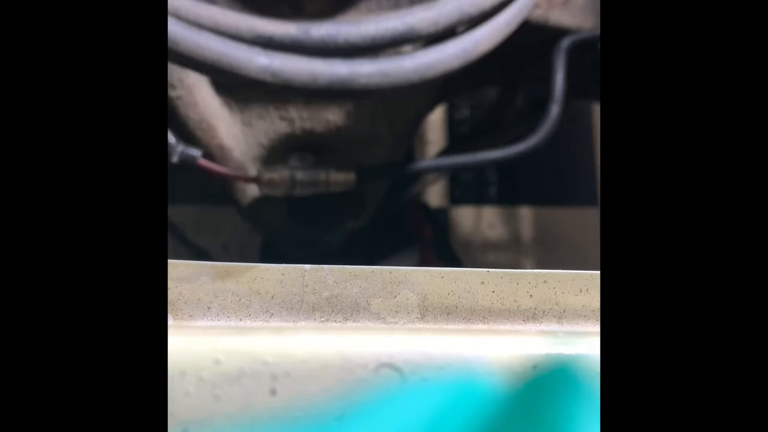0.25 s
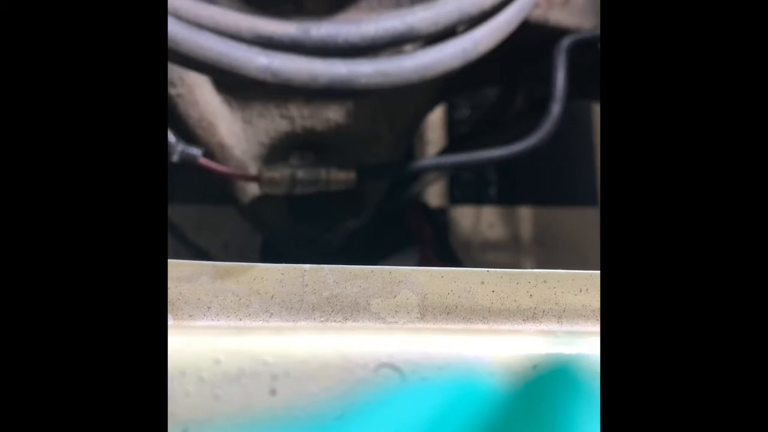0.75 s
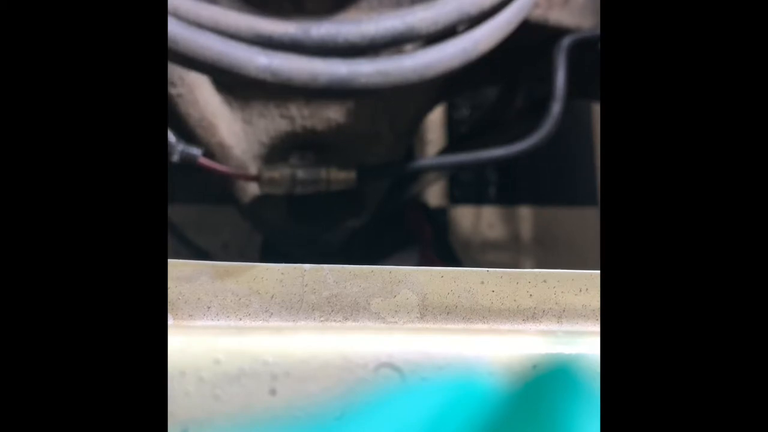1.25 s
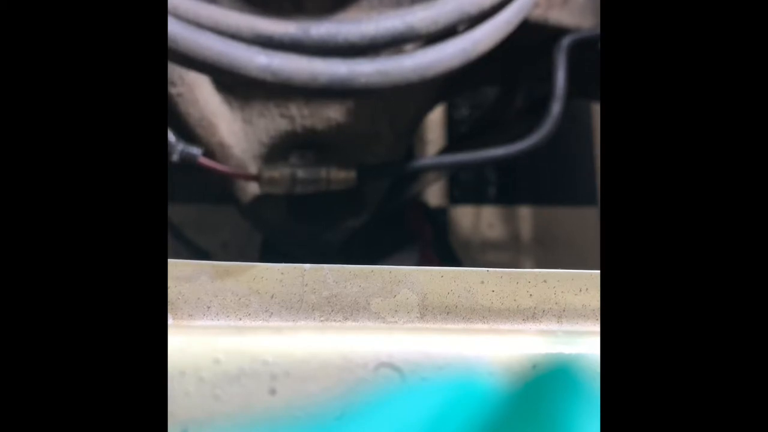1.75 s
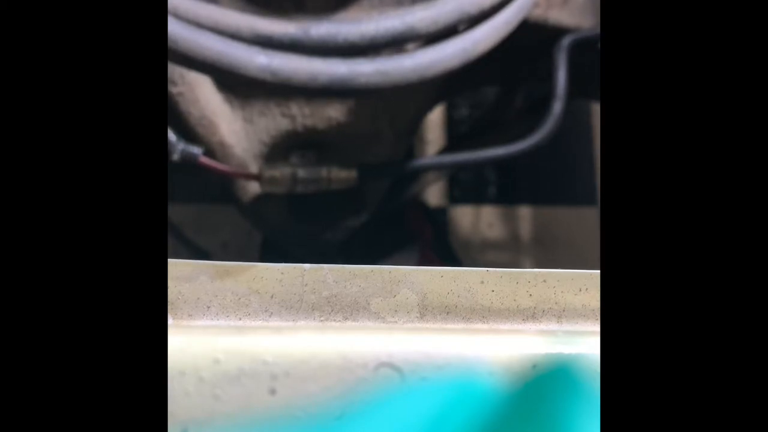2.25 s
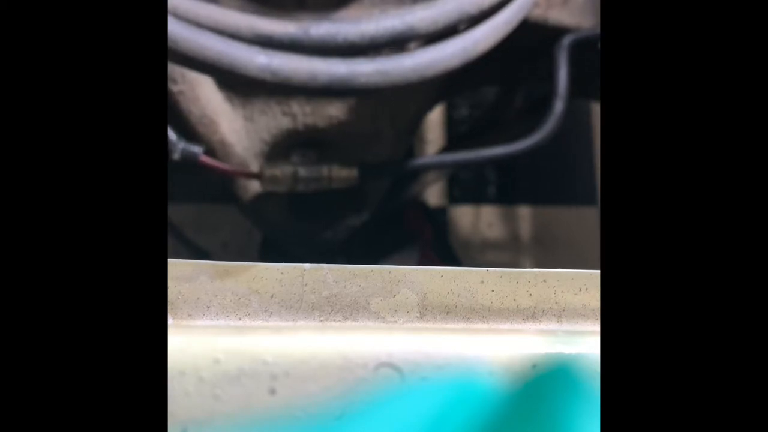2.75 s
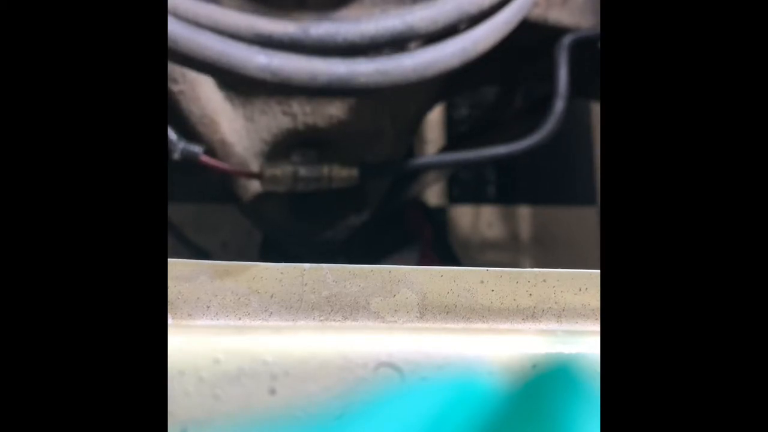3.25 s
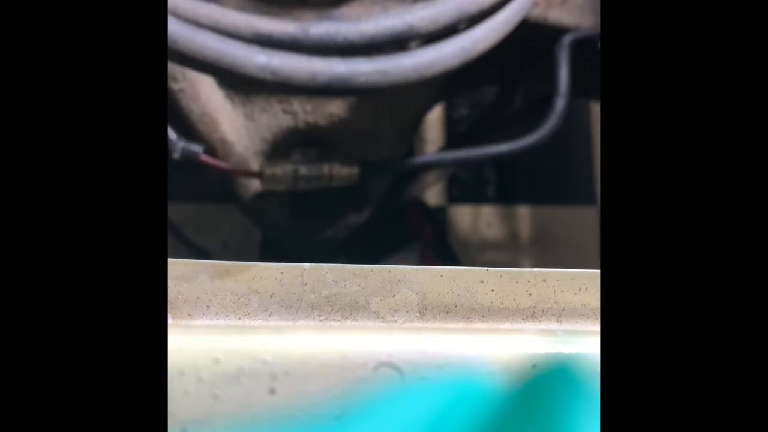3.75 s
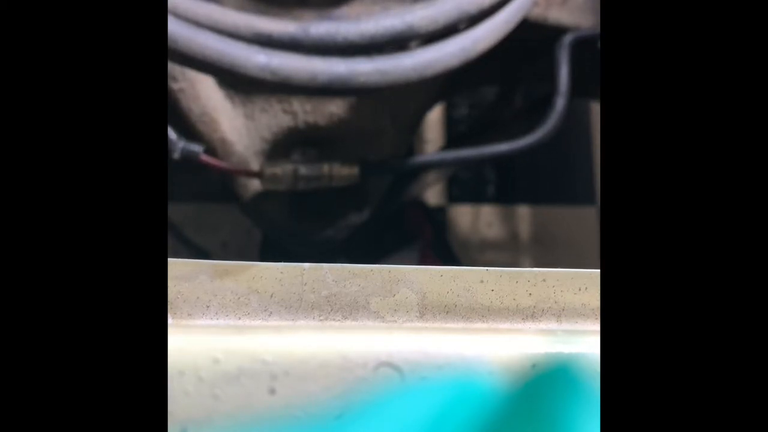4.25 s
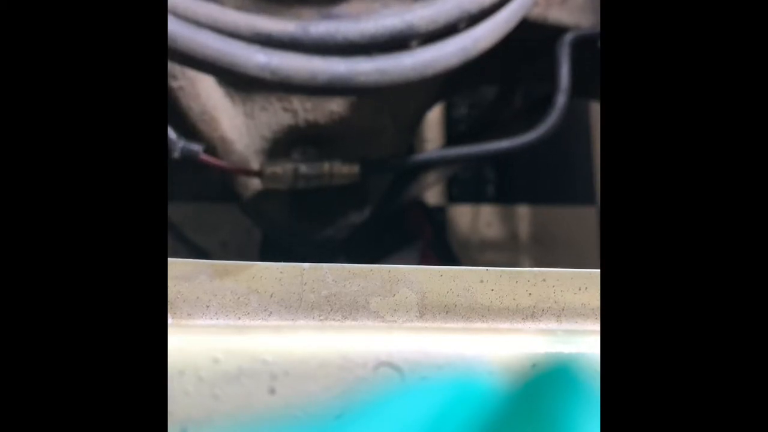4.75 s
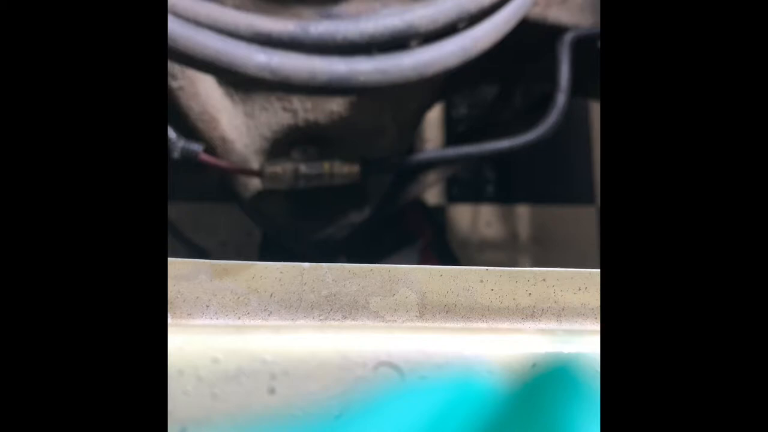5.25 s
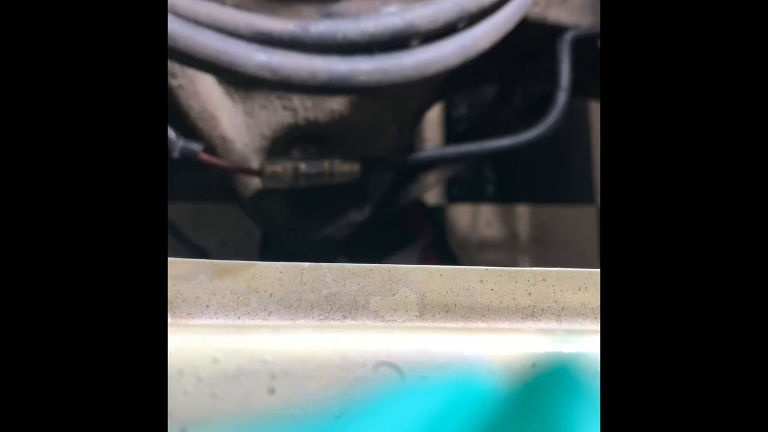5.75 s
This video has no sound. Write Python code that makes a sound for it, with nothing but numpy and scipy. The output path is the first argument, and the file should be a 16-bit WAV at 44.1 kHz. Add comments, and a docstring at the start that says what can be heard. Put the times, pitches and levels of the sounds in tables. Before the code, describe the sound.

A hydraulic floor jack is pumped in a garage, its steel handle clanking about once a second between rasping strokes.

```python
"""A hydraulic floor jack is pumped, and its steel handle linkage clanks at the turns of each stroke.
The piston rubs and groans as it lifts, the handle rustles, small knocks ring a hollow part and the
frame thumps. Behind it the car body hums low over the hush of a bare garage. The clanks, knocks and
thumps echo in the room. Left and right sound partly alike and out of step."""
import sys
import numpy as np
from scipy import signal
from scipy.fft import rfft, irfft
from scipy.io import wavfile
from scipy.ndimage import uniform_filter1d

SR = 44100
rng = np.random.default_rng(int(sys.argv[2]) if len(sys.argv) > 2 else 0)


def log_audio(samples):
    """Write samples as a 16-bit WAV file to the path given in sys.argv[1]."""
    # one column per channel
    frames = np.atleast_2d(samples).T
    # limit to full scale, then quantise
    limited = np.clip(frames, -1, 1)
    pcm = np.round(limited * 32767).astype(np.int16)
    wavfile.write(sys.argv[1], SR, pcm)


N = 264600  # 6 seconds


def gain_of(db):
    """Turns decibels into a number to multiply by."""
    return 10 ** (np.asarray(db) / 20)


def unit_rms(x):
    """Scales a signal so that its average power is 1."""
    return x / np.sqrt(np.mean(x ** 2) + 1e-20)


def look_up(table, hz):
    """Reads between the rows of a table, on a log-frequency scale."""
    f, value = np.transpose(table)
    return np.interp(np.log(hz + 1), np.log(f + 1), value)


def coloured(x, spectrum):
    """Makes each frequency louder or softer, as a table says."""
    return irfft(rfft(x) * gain_of(look_up(spectrum, np.fft.rfftfreq(N, 1 / SR))), N)


def resonate(x, hz, width):
    """Lets through a band of sound around one pitch."""
    pole = np.exp((2j * np.pi * hz - np.pi * width) / SR)
    return 2 * signal.lfilter([1 - abs(pole)], [1, -pole], x).real


def add(mix, start, sound):
    """Mixes a sound in, beginning at start seconds."""
    part = mix[..., round(start * SR):][..., :sound.shape[-1]]
    part += sound[..., :part.shape[-1]]


def gritty(grit_db):
    """Noise whose samples differ widely in size, as from many tiny contacts."""
    return unit_rms(rng.standard_normal((2, N)) * gain_of(grit_db * np.minimum(rng.exponential(1, N), 6)))


def wander(samples):
    """A slow random drift: noise smoothed twice over this many samples."""
    return unit_rms(uniform_filter1d(uniform_filter1d(rng.standard_normal(N), samples), samples))


def smooth_gain(powers):
    """Turns rows of power, given every 64th sample, into gain at every sample."""
    return np.array([np.interp(np.arange(N), 64 * np.arange(len(p)), np.sqrt(p)) for p in powers])


def held(rows, attack_s=0.033, sag_db=-6, release_s=0.065):
    """One loudness curve per level column: each event rises, sags while it lasts, then fades."""
    start, length, *db = np.transpose(rows)[..., None]
    t = np.arange(0, N + 64, 64) / SR - start
    rise = np.clip(t / attack_s, 0, 1)
    sag = gain_of(sag_db * np.clip(t / length, 0, 1))
    fade = np.exp(-np.maximum(t - length, 0) / release_s)
    return smooth_gain(((gain_of(db) * rise * sag * fade) ** 2).sum(axis=1))


# The tone of the room's hush: f/Hz, level/dB
AIR_TONE = [(18, -35), (30, -6), (50, 2.5), (85, 2.5), (130, -0.5), (250, -5.5), (380, -9.5), (470, -19),
            (750, -19.5), (1150, -17.5), (2000, -37), (4400, -34.5), (6000, -46), (11000, -46.5),
            (15000, -48)]

def air():
    """The room rumbles and hushes, swelling slowly."""
    level = gain_of(-53 + 2.55 * wander(6000))
    return level * unit_rms(coloured(rng.standard_normal((2, N)), AIR_TONE))


# Throbs of the car body: middle t/s, half-width/s, level/dB
THROBS = [(0.385, 0.025, -42.5), (0.6, 0.082, -60.5), (0.9, 0.12, -64), (1.4, 0.043, -64),
          (1.6, .035, -47.5), (1.88, 0.053, -53), (2.02, 0.037, -54), (2.14, 0.024, -57.5),
          (2.56, 0.047, -42), (3.02, 0.038, -48), (3.42, 0.018, -51), (3.64, .05, -50.5),
          (3.77, 0.018, -47), (3.92, 0.034, -48), (4.33, 0.053, -50.5), (4.59, 0.052, -48.5),
          (4.93, 0.026, -52), (5.36, 0.055, -52), (5.51, 0.024, -53), (5.97, 0.034, -78)]

def car_hum(pitch_hz=125.3, waver_hz=3.99, drone_db=-64.5):
    """The car body hums one low, wavering note that throbs over a faint drone."""
    t = np.arange(N) / SR
    throbs = sum(gain_of(db) * np.exp(-.5 * ((t - middle) / half) ** 2) for middle, half, db in THROBS)
    phase = 2 * np.pi * np.cumsum(pitch_hz + waver_hz * wander(2000)) / SR
    return (gain_of(drone_db) + throbs) * unit_rms(np.sin(phase))


# How long the garage echoes: f/Hz, ring time/s (the time to fade by 60 dB, called t60 below)
ECHO_TIMES = [(100, 1), (500, 0.83), (1400, 0.4), (3700, 0.51), (9700, 0.43), (13800, 0.31), (14500, 0.25)]

def garage_echo(x):
    """Dense echoes, each band dying at its own speed; three tails take turns so like blows differ."""
    hz, t, noise = signal.stft(rng.standard_normal((3, 2, SR)), SR, nperseg=256)
    fade = gain_of(-60 * t / look_up(ECHO_TIMES, hz)[:, None])
    tails = signal.istft(noise * fade, SR, nperseg=256)[1]
    tails *= np.minimum(np.arange(tails.shape[-1]) / (0.0027 * SR), 1)  # soft start
    turn = 2 * np.pi * 1.3 * np.arange(N) / SR
    out = np.zeros((2, N))
    for k, tail in enumerate(tails):
        share = np.sqrt(2 / 3) * np.cos(turn + k * np.pi / 3)
        out += signal.fftconvolve(x * share, tail / np.linalg.norm(tail[0]), axes=1)[:, :N]
    return out


def shudder(rise_s=0.045, t60=.9):
    """How much the linkage shakes: it swells just after each blow in CLANKS and dies slowly."""
    when, db = np.transpose(CLANKS)[:2, :, None]
    t = np.maximum(np.arange(0, N + 64, 64) / SR - when, 0)
    shakes = (1 - np.exp(-(t / rise_s) ** 2)) * gain_of(db - 60 * t / t60)
    return smooth_gain([(shakes ** 2).sum(axis=0)])[0]


# Swings of the handle: start t/s, length/s, level/dB
SWINGS = [(0.2, .12, -66), (0.75, .28, -71), (1.33, 0.055, -67), (1.39, 0.2, -61), (2.1, 0.039, -54.5),
          (2.4, .1, -61.5), (3.24, 0.057, -55.5), (4.03, 0.32, -69), (4.92, .1, -62), (5.39, .04, -56),
          (5.92, .1, -70)]
# The tone of their rustle: f/Hz, level/dB
RUSTLE_TONE = [(1000, 0), (3000, 13), (6000, 8.5), (8000, 4), (9501, 0.5), (12000, -4.5), (13800, -15),
               (14600, -18.5)]

def handle_rustle():
    """The handle rustles as it swings, and as it shudders after a blow."""
    level = np.hypot(held(SWINGS)[0], gain_of(-24) * shudder())
    return level * unit_rms(coloured(gritty(1.8), RUSTLE_TONE))


# Rubs of the piston: start t/s, length/s, then level/dB for low rasp, high rasp and squeak
RUBS = [(-0.03, 0.17, -63, -68, -69.5), (0.78, 0.28, -51.5, -50, -59.5), (1.08, 0.13, -57, -66, -65.5),
        (1.32, .03, -62, -75, -65), (1.39, 0.2, -77, -63.5, -81), (1.95, 0.2, -58, -54, -61.5),
        (2.09, 0.16, -53.5, -75, -71), (2.88, 0.27, -51.5, -51, -63), (3.35, .1, -66, -55, -92),
        (3.58, 0.17, -57, -62, -69), (3.77, .21, -50, -49, -59.5), (4.0, 0.31, -61.5, -64.5, -76),
        (4.62, 0.32, -54.5, -55, -63), (5.07, 0.1, -55.5, -64, -70), (5.31, 0.068, -41.5, -48.5, -54),
        (5.6, 0.24, -51.5, -55, -78)]
# The pitches that ring in each of those three sounds: f/Hz, width/Hz, level/dB
LOW_RASP = [(629, 89, -11.5), (892, 310, -4.5), (1149, 200, 1), (1554, 80, -4.5)]
HIGH_RASP = [(1730, 330, 0.5), (2052, 90, 2), (2180, 79, -2.5), (2357, 470, -2), (3040, 1200, -2.5),
             (3700, 1300, -17)]
SQUEAK = [(4467, 73, 0)]

def piston_rub():
    """Seals and pivots rub under load or shudder after a blow, ringing the cylinder and arm."""
    grit, out = gritty(0.75), np.zeros((2, N))
    shaking = gain_of([-25.5, -26.5, -43])[:, None] * shudder()
    levels = np.hypot(held(RUBS), shaking)
    for level, modes in zip(levels, (LOW_RASP, HIGH_RASP, SQUEAK)):
        rub = sum(gain_of(db) * unit_rms(resonate(resonate(grit, hz, width), hz, width))
                  for hz, width, db in modes)
        out += level * unit_rms(rub)
    return out


# Knocks on a hollow part: t/s, level/dB, f/Hz, ring time/s
KNOCKS = [(0.335, -50.5, 444, 0.12), (0.752, -59, 480, 0.12), (0.874, -23.5, 465.5, 0.069),
          (1.55, -30.5, 468, 0.16), (2.07, -37, 479, 0.1), (2.492, -25.5, 468, 0.091),
          (2.979, -53, 455, 0.13), (3.435, -66, 456, 0.095), (3.755, -42, 496, 0.15),
          (3.854, -22, 471, 0.073), (4.705, -31, 500, 0.085), (5.624, -33, 454, 0.096)]

def hollow_knocks():
    """Each knock rings a hollow part on one note that starts softly."""
    out, t = np.zeros((2, N)), np.arange(SR // 2) / SR
    rise = 1 - np.exp(-t / 0.017)
    for when, db, hz, t60 in KNOCKS:
        note = np.sin(2 * np.pi * (hz * t + rng.random((2, 1))))
        add(out, when - .004, rise * gain_of(db - 60 * t / t60) * note)
    return out


# Heavy, dull thumps of the jack's frame: t/s, level/dB, ring time multiplier
THUMPS = [(2.795, -29.5, 1.0), (2.824, -29.5, 1), (4.545, -25, 1.0), (4.581, -16.5, 0.72)]
# The frame's notes: f/Hz, level/dB, ring time/s
FRAME_NOTES = [(90, -11.5, 0.23), (165, -6, 0.079), (245, -7, 0.16), (304, -9, 0.15), (403, -4.5, 0.11),
               (544, -10, 0.064), (725, -37, .1), (848, -19, 0.098)]

def frame_thumps():
    """Each thump rings all the frame's low notes, in a slightly different mix every time."""
    out, t = np.zeros((2, N)), np.arange(SR // 2) / SR
    hz, note_db, t60 = np.transpose(FRAME_NOTES)[..., None]
    rise = 1 - np.exp(-t / 0.0064)
    for when, db, stretch in THUMPS:
        softer_db = 3.1 * rng.random(hz.shape)
        notes = np.sin(2 * np.pi * (hz * t + rng.random((2, *hz.shape))))
        fade = gain_of(db + note_db - softer_db - 60 * t / (t60 * stretch))
        add(out, when - .004, (rise * fade * notes).sum(axis=1))
    return out


# Blows in the steel linkage: t/s, level/dB, then extra level/dB for the body, bright and top bands
CLANKS = [(0.214, -67.5, -4.5, 5.5, 11), (0.311, -46, -3, -11, -44), (0.3313, -36, 2, -18.5, -45.5),
          (0.413, -32, 0, -12.5, -46), (0.432, -20.5, -12, 1.5, -6), (0.7478, -35, -6, -10, -54),
          (0.872, -40, -2, -14, -47), (1.076, -53, -15, -32, -35), (1.273, -70, -9, -20, -30),
          (1.334, -57.5, -1, -14, -29), (1.4087, -60.5, 5, -22, -29), (1.55, -49, 7.5, -20, -27),
          (1.624, -39.5, 7.5, -7.5, -39), (1.6474, -20.5, -12, 0, -6), (2.006, -51, -11.5, -17, -38),
          (2.0663, -41, 1, -20, -39), (2.447, -51.5, 1.5, -7, -27), (2.4923, -44.5, 0, -9.5, -36.5),
          (2.5318, -27.5, -3.5, -9, -29), (2.5465, -22, -7, 4.5, -2), (2.7693, -33, -1, -1.5, 1),
          (2.7935, -43.5, 12, -31, -27), (2.8194, -54.5, 11.5, -22, -18), (2.8657, -31.5, -10, -0.5, -44),
          (2.9785, -49, 11.5, -6, -41), (3.244, -54, 8.5, -3.5, -4), (3.3623, -51, 0.5, -39, -33),
          (3.397, -53, 6.5, -18, -36), (3.4369, -31, -2, -9.5, -42), (3.4502, -22, -9.5, -1, -11.5),
          (3.7504, -30, -7.5, 0.5, -51), (3.8544, -40.5, -12.5, -24, -38), (4.1086, -51.5, -4, -35, -5),
          (4.212, -51, 7.5, -24, -11), (4.2896, -31.5, -1.5, -13, -16), (4.3025, -21.5, -8.5, -0.5, -7.5),
          (4.5457, -36, 4, -1, -1), (4.58, -55, 11, -9, -11), (4.6118, -24, -8, -1.5, -8.5),
          (4.707, -38, -7.5, -6.5, -29), (5.0786, -51.5, -2, -20, -29), (5.171, -33.5, -1, -25, -23),
          (5.1903, -23.5, -9, -2.5, -12), (5.5069, -23, -10.5, -2, -11.5), (5.6236, -35.5, -7, -14, -40),
          (5.954, -55, 0, -4.5, -11)]
# The tone shared by all blows: f/Hz, level/dB
CRACK_TONE = [(30, -30), (70, -2), (200, 2), (600, 3.5), (1200, 6.5), (2000, 1), (3500, 3.5), (5500, 5.5),
              (7600, 7.5), (9000, 0.5), (11400, -0.5), (12600, -8), (13700, -7.5), (14500, -14.5),
              (16000, -24)]
# The steel's notes: f/Hz, level/dB, ring time/s (limited to 0.25 s when played)
STEEL_NOTES = [(625.5, -12, 0.3), (822, -9, 0.18), (1038, -14, 0.43), (1185, -0.5, 0.034),
               (1281.6, -9, 0.16), (1551, -6.5, 0.057), (1990, -14.5, 0.31), (2510, -15.5, 0.066),
               (2686, -10.5, 0.078), (2840, -4.5, 0.12), (3196, -12.5, 0.19), (3265, -8.5, 0.15),
               (3760, -6.5, 0.037), (4450, -10.5, 0.05), (4324, -7.5, 0.1), (4410, -4.5, 0.052),
               (5355, -2, 0.074), (5800, -6, 0.11), (6880, -14, 0.058), (7090, -31, 0.052),
               (7160, -25.5, 0.049), (7800, -8, 0.12), (6946, -11.5, .12), (8370, -3, 0.09)]

def linkage_clanks(rise_s=0.012):
    """Each blow is a short chatter of contacts that cracks and sets the steel ringing."""
    age = np.arange(SR // 4) / SR / rise_s
    burst = (age * np.exp(1 - age)) ** 2
    chatter = np.zeros((6, N))  # one loudness curve per band, from low to high
    for when, db, body_db, bright_db, top_db in CLANKS:
        thud_db = -1.5 + 1.6 * body_db
        treble_db = -8.5 + 1.61 * bright_db
        bands_db = np.array([thud_db, body_db, 0, bright_db, treble_db, top_db])
        add(chatter, when - 0.55 * rise_s, gain_of(db + bands_db)[:, None] * burst)
    hz = np.fft.rfftfreq(N, 1 / SR)
    # Each filter keeps what is above its edge; one minus the next leaves a band.
    above = [1] + [1 / (1 + (edge_hz / (hz + 1)) ** 6) for edge_hz in (350, 1300, 2700, 5000, 9800)] + [0]
    grit = gritty(3.3)
    spectrum = sum((above[k] - above[k + 1]) * rfft(grit * chatter[k]) for k in range(6))
    crack = coloured(irfft(spectrum, N), CRACK_TONE)
    t = np.arange(SR // 2) / SR
    ring = sum(gain_of(db - 60 * t / min(t60, .25)) * np.sin(2 * np.pi * f * t)
               for f, db, t60 in STEEL_NOTES)
    return crack + gain_of(-37) * signal.fftconvolve(crack, ring[None], axes=1)[:, :N]


def scene():
    """The struck parts and their echoes, over rub, rustle, hum and air."""
    steel = linkage_clanks()
    hollow = hollow_knocks() + frame_thumps()
    echo = garage_echo(gain_of(-2) * steel + gain_of(-14.5) * hollow)
    return steel + hollow + echo + piston_rub() + handle_rustle() + car_hum() + air()


# How alike left and right sound: f/Hz, likeness (0 to 1)
STEREO_LIKENESS = [(30, .98), (200, .92), (500, .68), (860, .25), (1900, .55), (2900, .1), (3300, .55),
                   (4300, .1), (5100, .85), (5900, .55), (7100, .97), (8100, .65), (8800, .6), (9200, .998),
                   (10200, .998), (10600, .62), (11500, .72), (12100, .995), (13100, .995), (13900, .6),
                   (14400, .99), (15200, .99), (15700, .7)]
# How far right leads left: f/Hz, lead/half turns (1 is upside down, below 0 is behind)
STEREO_LEAD = [(60, 0), (500, .22), (860, .6), (1200, -.15), (2300, -.2), (3300, .5), (4600, 1.),
               (5000, 1.), (6000, .45), (7000, 0.), (7500, -.05), (8400, -.5), (9100, -1.), (10250, -1.),
               (11200, -1.65), (11900, -2.), (13300, -2.), (14200, -3.), (16000, -3.)]

def record(dry, cutoff_hz=15790):
    """Left and right are partly alike and out of step; some treble bands match or oppose almost fully."""
    hz = np.fft.rfftfreq(N, 1 / SR)
    left, other = rfft(dry)
    likeness = look_up(STEREO_LIKENESS, hz)
    shift = np.exp(1j * np.pi * look_up(STEREO_LEAD, hz))
    right = likeness * shift * left + np.sqrt(1 - likeness ** 2) * other
    stereo = irfft(np.array([left, right]), N)
    lowpass = signal.firwin(511, cutoff_hz, window=("kaiser", 9), fs=SR)  # cuts the highest treble
    return signal.oaconvolve(stereo, lowpass[None], "same")


dry = scene()
out = record(dry)
log_audio(out)
```